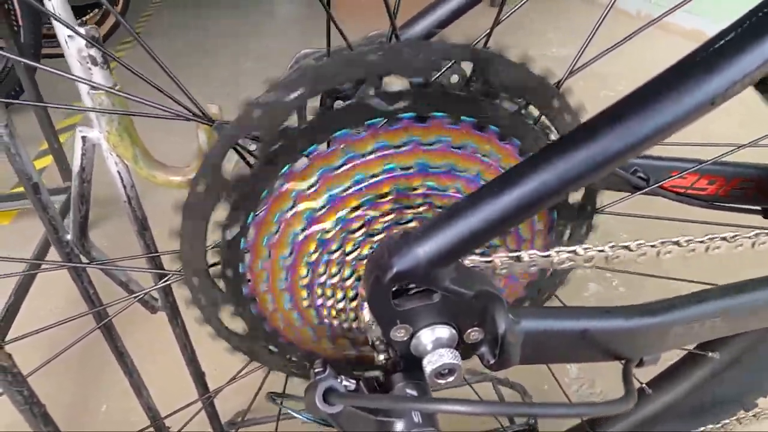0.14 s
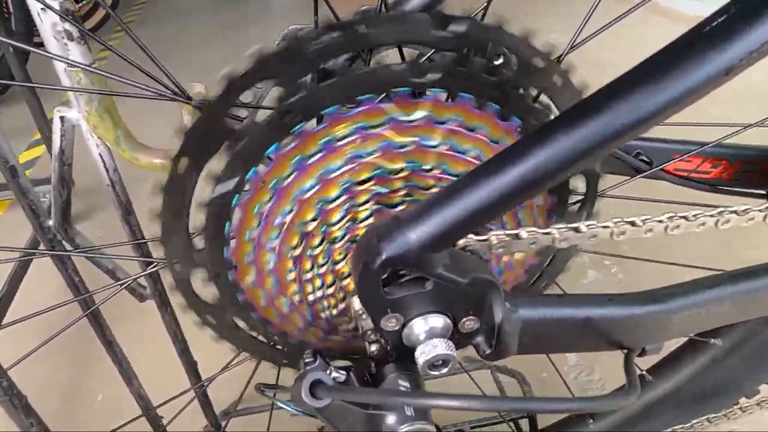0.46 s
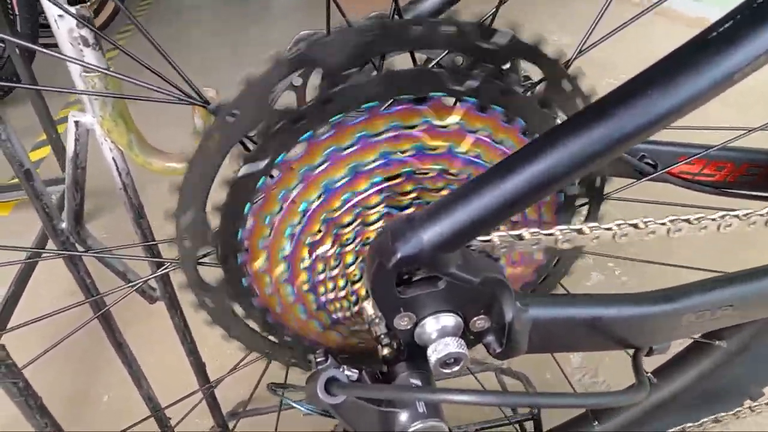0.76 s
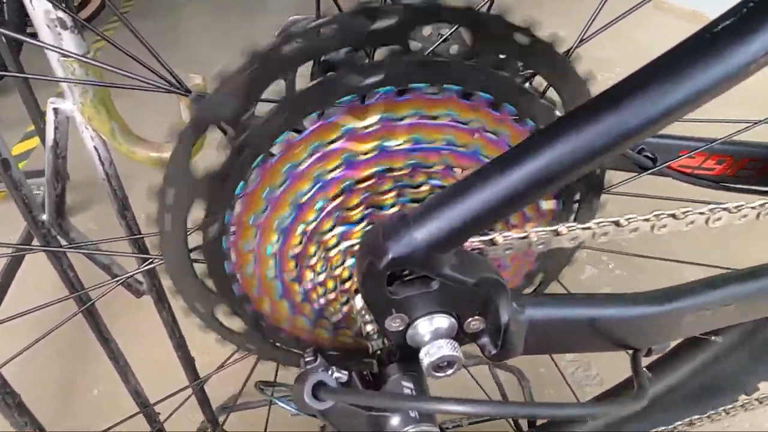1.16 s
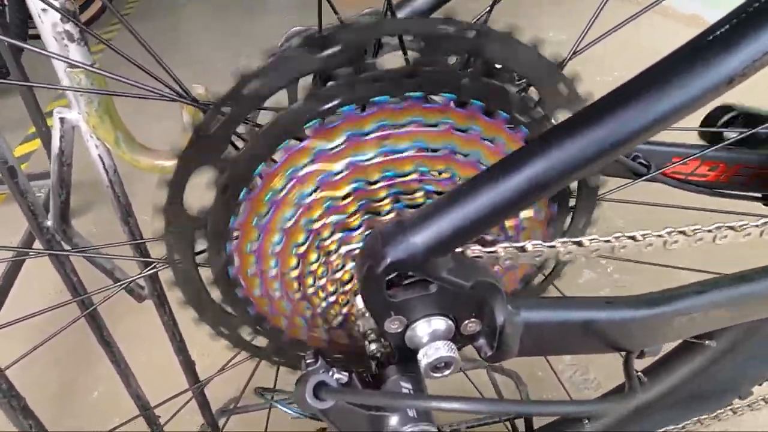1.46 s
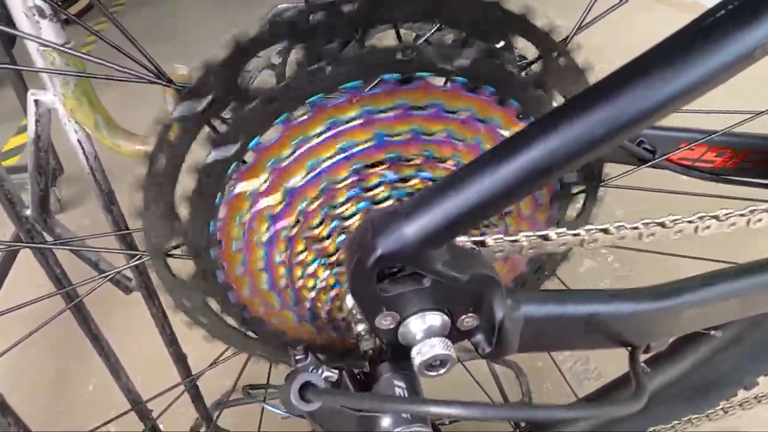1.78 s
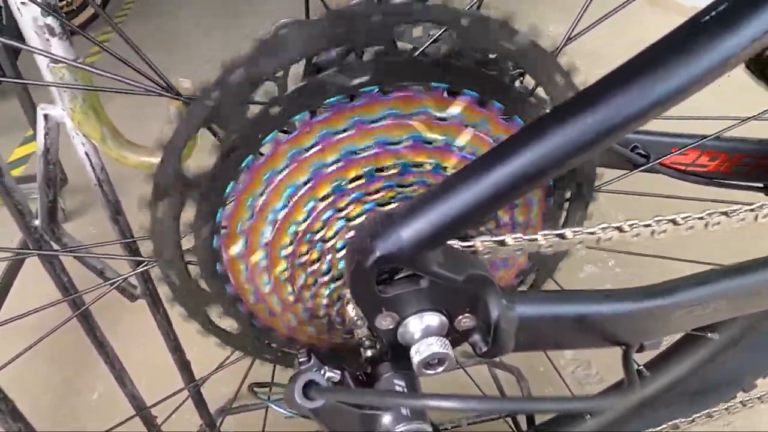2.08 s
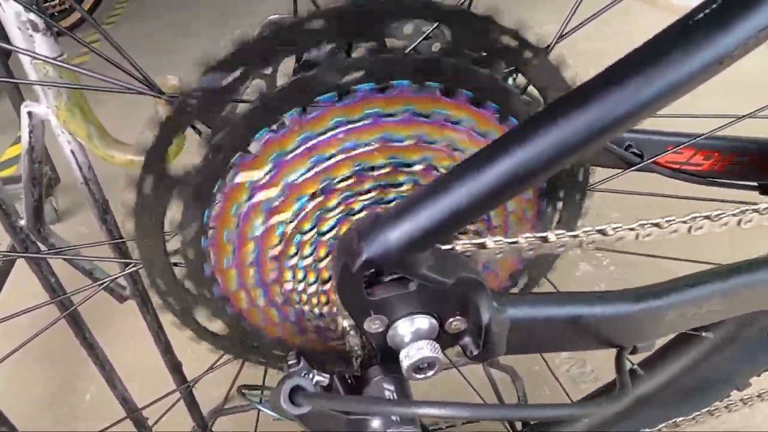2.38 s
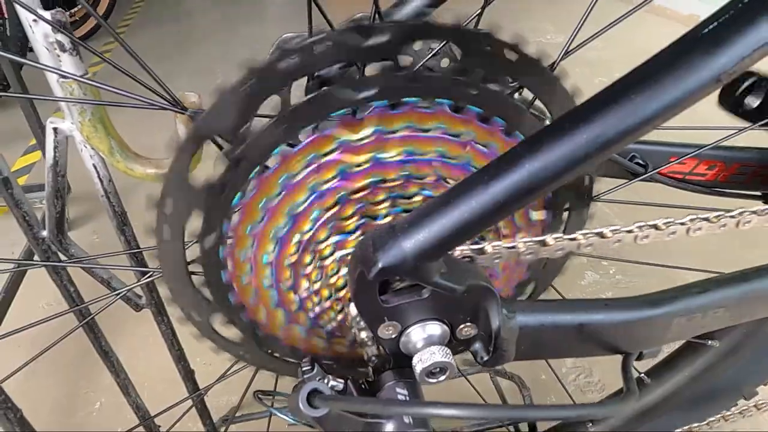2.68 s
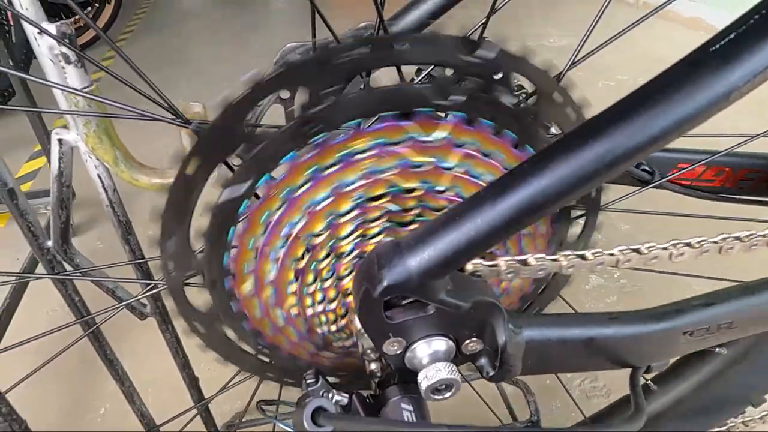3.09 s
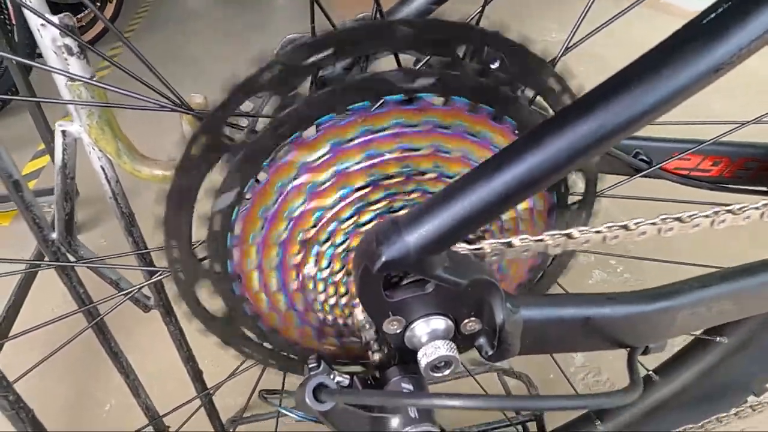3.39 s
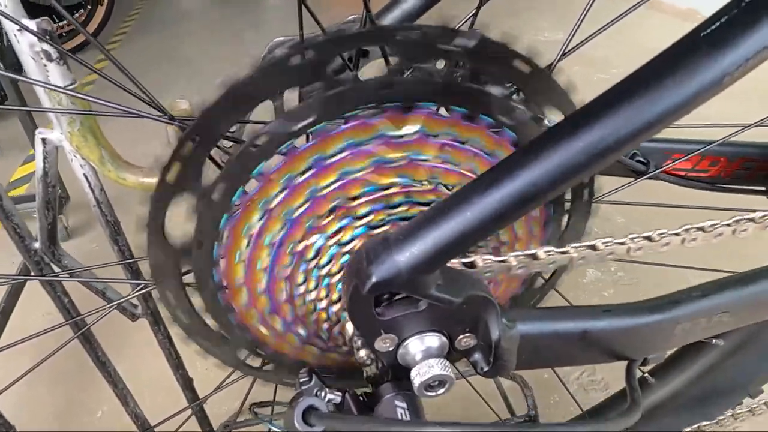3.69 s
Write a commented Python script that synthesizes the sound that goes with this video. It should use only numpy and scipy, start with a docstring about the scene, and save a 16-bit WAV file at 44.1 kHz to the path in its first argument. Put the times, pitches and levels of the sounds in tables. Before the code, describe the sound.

A bicycle freehub ratchets close to the microphone in a quiet indoor shop, a continuous bright metallic buzz with ringing sprockets; its speed wavers, then rises after three seconds and drops at the very end.

```python
"""A bicycle on a stand in a shop, its rear freehub ratcheting close by from the first moment.
Two sets of pawls drop off the teeth in turn, 340-490 times a second, and rebound: steel sizzles, sprockets ring.
The speed surges through the first three seconds, with deeper sprocket rings at 2.3, 2.65 and 2.84 s.
It then runs faster and drops back right at the end; the hub shell's rasp and the ring have thinned by then.
Soft knocks of filtered noise come and go throughout, over a faint room rumble."""
import sys
import numpy as np
from scipy import signal
from scipy.fft import rfft, irfft
from scipy.io import wavfile
from scipy.ndimage import uniform_filter1d

SR = 44100
rng = np.random.default_rng(int(sys.argv[2]) if len(sys.argv) > 2 else 0)


def persist_wave(psi):
    """Save psi, clipped to +-1, as 16-bit WAV."""
    counts = np.round(np.clip(psi, -1, 1) * 32767).astype(np.int16)
    wavfile.write(sys.argv[1], SR, np.atleast_2d(counts).T)


N = 169785
TIME = np.arange(N) / SR

# speed of the ratchet: t/s, rate of pawl snaps/Hz
SNAP_RATE = [(0.0, 384), (0.12, 375), (0.3, 358), (0.49, 397), (0.65, 383), (0.83, 359), (0.95, 344),
             (1.09, 399), (1.22, 392), (1.39, 360), (1.62, 346), (1.95, 361), (2.07, 382), (2.27, 392),
             (2.43, 409), (2.86, 380), (2.97, 445), (3.37, 450), (3.53, 460), (3.65, 450), (3.77, 493),
             (3.85, 360)]
# one cycle, in which each pawl set snaps and rebounds twice: place in the cycle/0-1, relative level/dB
CONTACTS = [(.02, -0.5), (.11, -6), (.26, -7), (.52, -1), (.61, -5.5), (.77, -9.5)]
# force of the snaps, driving sizzle and steel: t/s, relative level/dB
SNAP_FORCE = [(0.0, -21), (0.15, -21), (0.3, -23), (0.32, -21), (1.05, -21.5), (1.13, -20), (1.18, -21),
              (2.49, -21.5), (2.57, -22), (3.85, -22)]
# colour of the dense sizzle: f/Hz, relative level/dB
SIZZLE_COLOUR = [(5200, -33), (5900, -18), (6150, -8.5), (6550, -7.5), (7400, -4), (8000, -4.5),
                 (8700, -0.5), (9400, 0.5), (10400, -6), (11300, -5.5), (12050, -2.5), (12280, -11),
                 (12850, -3), (13450, -11), (14200, -5.5), (14800, -11.5), (15700, -8.5)]
# modes of the pawls and the toothed ring: f/Hz, relative level/dB, t60/s
STEEL_MODES = [(6139, -8.5, 0.023), (6220, -7, 0.024), (7190, -8.5, 0.037), (7573, -4, 0.025),
               (7853, -4.5, 0.016), (8392, -1, 0.027), (8580, -.5, 0.027), (8820, -8, 0.027),
               (9390, -1.5, 0.015), (9640, -13, 0.019), (10718, -7.5, 0.032), (11470, 0, 0.016),
               (14460, -8, 0.024), (14800, -12, .03)]
# colour of the hub shell: f/Hz, relative level/dB
SHELL_COLOUR = [(3400, -22.5), (3750, -18), (3880, -0.5), (4400, 1), (5000, 1.5), (5800, 1.5), (6600, -26),
                (9000, -42)]
# the hub shell's rasp over time: t/s, level before trim/dB
SHELL_LEVEL = [(0.0, -36), (0.14, -40.5), (3.02, -47.5), (3.83, -52), (3.85, -48)]
# band edges of the treble shimmer: f/Hz
SHIMMER_EDGES = [7300, 9600, 12500]
# sprocket modes: f/Hz, relative level/dB, t60/s
SPROCKET_MODES = [(1944.6, -1.5, 0.065), (2008, -3.5, 0.042), (2059, -3.5, 0.039), (2149, -1, 0.053),
                  (2291, 1.5, 0.076), (2311, -2, 0.053), (2345, -5.5, 0.073), (2410, -7.5, 0.039),
                  (2485, -2.5, 0.051), (2497, 0, 0.066), (2643, -5, 0.044), (2703, -2.5, 0.023),
                  (2665, -21, 0.039), (2920, -12.5, 0.049)]
# the sprockets' ring over time: t/s, level before trim/dB
SPROCKET_LEVEL = [(0.0, -34), (0.34, -32.5), (0.59, -36.5), (1.11, -33.5), (1.48, -37), (1.53, -34),
                  (1.97, -40), (2.03, -42), (2.07, -37.5), (2.27, -42), (2.33, -35.5), (2.57, -40),
                  (2.68, -34), (2.83, -40.5), (2.85, -36.5), (2.98, -39), (3.77, -41), (3.85, -49)]
# brief deeper rings of the sprockets: start t/s, peak level/dB, centre f/Hz, t60/s
DEEP_RINGS = [(2.3, -55, 1696, 0.16), (2.301, -29, 1990, 0.31), (2.651, -43, 2078, .2),
              (2.84, -30, 2008, 0.22)]
# soft knocks of handling: start t/s, peak level/dB, centre f/Hz, t60/s
KNOCKS = [(0.168, -55.5, 157, 0.29), (.49, -64.5, 840, 0.17), (0.519, -55, 32.5, 0.2),
          (0.678, -64.5, 394, 0.34), (.73, -60, 67.6, 0.19), (1.27, -65, 1120, .15),
          (1.49, -66.5, 259.3, 0.13), (1.5, -62.5, 154.1, 1), (1.52, -65, 1250, 0.16),
          (1.75, -53, 30.1, 0.11), (1.76, -65, 665, 0.086), (2.06, -66.5, 1151, 0.22),
          (2.43, -67, 1251, 0.16), (3.03, -67, 86, 0.16), (3.15, -59, 29.7, 0.13), (3.33, -71, 679.2, 0.21),
          (3.45, -64, 229.9, 0.19), (3.727, -53.5, 813, .15), (3.735, -59.5, 425, 0.12),
          (3.739, -63, 1355, 0.43), (3.8, -56, 530, 0.48)]
# colour of the room noise: f/Hz, relative level/dB
ROOM_COLOUR = [(20, 12), (35, -3), (70, -5.5), (120, -1), (158, 2.5), (200, -10.5), (320, -10.5),
               (600, -16), (1400, -14.5), (1700, 0.5), (3400, -50), (15000, -42)]

# timing scatter, strength scatter and each mode's own scatter (a fraction), all as standard deviations
SNAP_JITTER_S, REBOUND_JITTER_S, STRENGTH_SPREAD_DB, MODE_SPREAD = .000042, .00015, 1.52, 0.63
SIZZLE_DB, STEEL_DB, STEEL_LOW_HZ = -1.1, -4, 5280
BURST_S, CRACK_SHARE = 0.0024, 0.45  # decay time constant; the crack's share of the power
SHELL_TRIM_DB, SHELL_LOW_HZ = 0.8, 3500
SHIMMER_DB, SHIMMER_RATE_HZ = 0.71, 13  # rms depth; fastest waver
SPROCKET_LOW_HZ, SPROCKET_HIGH_HZ, SPROCKET_TRIM_DB = 1945.6, 3080, 0.5
SECOND_SET_DROP_DB, REBOUND_RING_DB = 10, -5
DEEP_HALF_WIDTH_HZ = 74.5
SWELL_ATTACK_S, KNOCK_WIDTH = 0.024, 0.094  # knock width as a fraction of its pitch
ROOM_T60_S, ROOM_GAP_S = 0.15, .003
SIDE_LOW_DB, SIDE_TREBLE_DB, SIDE_SPLIT_HZ = -64, -23.5, 4000
ROOM_DB, RUMBLE_SWELL_DB, RUMBLE_HZ = -69, -1, 190
CUTOFF_HZ = 15700


def from_db(db):
    """Decibels to gain."""
    return 10 ** (np.asarray(db) / 20)


def rms_one(x):
    """Scale to unit rms."""
    return x / np.sqrt(np.mean(x ** 2) + 1e-20)


def in_time(rows):
    """A control curve at every sample."""
    return np.interp(TIME, *np.transpose(rows))


def colour(x, points):
    """Shape a sound by a spectrum of points, straight in dB over log frequency; rms 1."""
    hz, db = np.transpose(points)
    bins = np.maximum(np.fft.rfftfreq(N, 1 / SR), 1)
    gain = from_db(np.interp(np.log(bins), np.log(hz), db))
    return rms_one(irfft(rfft(x) * gain, N))


def cut(x, hz, kind, order=4):
    """Butterworth filter."""
    return signal.sosfilt(signal.butter(order, hz, kind, fs=SR, output="sos"), x)


def smooth_low(x, hz, order):
    """Low-pass run both ways, so nothing is delayed."""
    return signal.sosfiltfilt(signal.butter(order, hz, fs=SR, output="sos"), x)


def slow_waver(hz):
    """A random control curve of rms 1 with little motion above the given rate."""
    return rms_one(cut(rng.standard_normal(N + SR), hz, "low", order=2)[SR:])  # skip the filter's start


def click_train(times, sizes):
    """Clicks of the given sizes at the given times."""
    return np.bincount(np.clip(times * SR, 0, N - 1).astype(int), sizes, N)


def ring(clicks, hz, t60):
    """A two-pole resonator: each click sets off a sine that dies by 60 dB in t60."""
    radius = np.exp(-np.log(1000) / (t60 * SR))
    angle = 2 * np.pi * hz / SR
    return signal.lfilter([0, np.sin(angle)], [1, -2 * radius * np.cos(angle), radius ** 2], clicks + 1e-18)


def swell(start, t60):
    """A soft rise and a dying tail."""
    age = np.maximum(TIME - start, 0)
    return (1 - np.exp(-age / SWELL_ATTACK_S)) * np.exp(-np.log(1000) * age / t60)


def pawl_contacts():
    """Time, strength, pawl set (0 or 1) and rebound flag of every contact; snaps keep time better than rebounds."""
    cycles = np.cumsum(in_time(SNAP_RATE)) / SR / 2  # two snaps to a cycle
    place, db = np.transpose(CONTACTS)
    due = (np.arange(int(cycles[-1]) + 1)[:, None] + place).ravel()
    snap, nth = np.divmod(np.arange(len(due)), len(CONTACTS) // 2)
    chance = rng.standard_normal((len(due), 2))
    jitter = np.where(nth > 0, REBOUND_JITTER_S, SNAP_JITTER_S)
    times = np.interp(due, cycles, TIME) + jitter * chance[:, 0]
    sizes = from_db(np.resize(db, len(due)) + STRENGTH_SPREAD_DB * np.clip(chance[:, 1], -2, 2))
    heard = due < cycles[-1]
    return times[heard], sizes[heard], snap[heard] % 2, nth[heard] > 0


def struck(times, sizes, modes):
    """Every contact strikes every mode with a strength of its own; neighbouring modes start in opposite phase."""
    out = np.zeros(N)
    for k, (hz, db, t60) in enumerate(modes):
        strength = sizes * (1 + MODE_SPREAD * rng.standard_normal(len(times)))
        out += (-1) ** k * from_db(db) * ring(click_train(times, strength), hz, t60)
    return rms_one(out)


def bursts(times, sizes):
    """Each contact is a sharp crack plus decaying noise, standing for countless short-lived modes."""
    decay = np.exp(-2 / (BURST_S * SR))
    energy = signal.lfilter([1], [1, -decay], click_train(times, sizes ** 2) + 1e-18)
    crack = rms_one(click_train(times, sizes * rng.choice([-1, 1], len(times))))
    noise = rms_one(np.sqrt(energy) * rng.standard_normal(N))
    return np.sqrt(CRACK_SHARE) * crack + np.sqrt(1 - CRACK_SHARE) * noise


def ratchet(times, sizes):
    """The bright buzz of pawls and toothed ring, with the duller rasp of the hub shell."""
    sizzle = colour(cut(bursts(times, sizes), STEEL_LOW_HZ, "high", order=8), SIZZLE_COLOUR)
    steel = rms_one(cut(struck(times, sizes, STEEL_MODES), STEEL_LOW_HZ, "high", order=8))
    shell = colour(cut(bursts(times, sizes), SHELL_LOW_HZ, "high", order=8), SHELL_COLOUR)
    buzz = from_db(SIZZLE_DB) * sizzle + from_db(STEEL_DB) * steel
    rasp = from_db(in_time(SHELL_LEVEL) + SHELL_TRIM_DB) * shell
    return from_db(in_time(SNAP_FORCE)) * buzz + rasp


def shimmer(x):
    """The level wavers a little, each band on its own."""
    out, rest = 0, x
    for edge in list(SHIMMER_EDGES) + [None]:
        band = smooth_low(rest, edge, 4) if edge else rest
        out = out + band * from_db(SHIMMER_DB * slow_waver(SHIMMER_RATE_HZ))
        rest = rest - band
    return out


def sprockets(times, sizes, pawl_set, rebound):
    """The sprockets ring in a narrow cluster of modes, shaken mostly by the snaps of one pawl set."""
    push = from_db(REBOUND_RING_DB * rebound - SECOND_SET_DROP_DB * pawl_set)
    rings = struck(times, sizes * push, SPROCKET_MODES)
    rings = cut(rings, [SPROCKET_LOW_HZ, SPROCKET_HIGH_HZ], "band", order=9)
    even = rings / np.sqrt(uniform_filter1d(rings ** 2, size=6000) + 1e-12)  # level out, then ride
    return from_db(in_time(SPROCKET_LEVEL) + SPROCKET_TRIM_DB) * even


def deep_rings(times, sizes):
    """Now and then the snaps, narrowed to a low sprocket band, swell up and die away."""
    out, snaps = np.zeros(N), click_train(times, sizes)
    for start, db, hz, t60 in DEEP_RINGS:
        tone = cut(snaps, [hz - DEEP_HALF_WIDTH_HZ, hz + DEEP_HALF_WIDTH_HZ], "band", order=3)
        tone = tone * swell(start, t60)
        out += from_db(db) * tone / np.abs(tone).max()
    return out


def shop(x):
    """The close sound sits in the middle; faint decaying reflections, opposite left and right, widen its treble."""
    age = np.arange(SR // 2) / SR
    tail = rng.standard_normal(len(age)) * np.exp(-np.log(1000) * age / ROOM_T60_S) * (age > ROOM_GAP_S)
    lead_in = np.concatenate([x[:len(age)][::-1], x])  # the room already sounds at the start
    side = signal.fftconvolve(lead_in, tail / np.linalg.norm(tail))[len(age):len(age) + N]
    low = from_db(SIDE_LOW_DB) * cut(side, SIDE_SPLIT_HZ, "low")
    treble = from_db(SIDE_TREBLE_DB) * cut(side, SIDE_SPLIT_HZ, "high")
    return x + (low + treble) * np.array([[1], [-1]])


def knocks():
    """Dull, soft bumps of the bicycle and its stand: narrow noise that swells and dies."""
    out = np.zeros(N)
    for start, db, hz, t60 in KNOCKS:
        edges = [hz / (1 + KNOCK_WIDTH), hz * (1 + KNOCK_WIDTH)]
        bump = cut(rng.standard_normal(N), edges, "band", order=2) * swell(start, t60)
        out += from_db(db) * bump / np.abs(bump).max()
    return out


def room_floor():
    """Faint room noise whose bass swells and sinks."""
    noise = colour(rng.standard_normal(N), ROOM_COLOUR)
    bass = smooth_low(noise, RUMBLE_HZ, 2)
    bass_gain = from_db(RUMBLE_SWELL_DB * slow_waver(1.9))
    return from_db(ROOM_DB) * (noise + bass * (bass_gain - 1))


def scene():
    """The freehub in the shop, over the knocks and the room's floor."""
    times, sizes, pawl_set, rebound = pawl_contacts()
    hub = shimmer(ratchet(times, sizes))
    hub = hub + sprockets(times, sizes, pawl_set, rebound)
    hub = hub + deep_rings(times[~rebound], sizes[~rebound])
    return shop(hub) + knocks() + room_floor()


def record(dry):
    """The top is cut steeply by an elliptic low-pass."""
    return signal.sosfilt(signal.ellip(12, .2, 80, CUTOFF_HZ, fs=SR, output="sos"), dry)


dry = scene()
out = record(dry)
persist_wave(out)
```